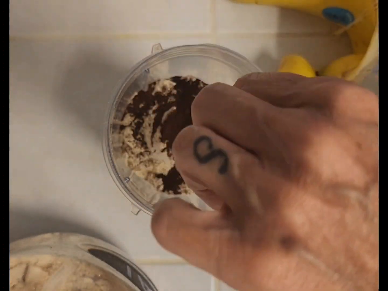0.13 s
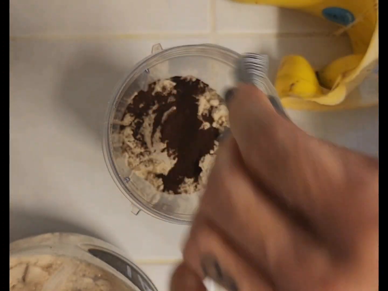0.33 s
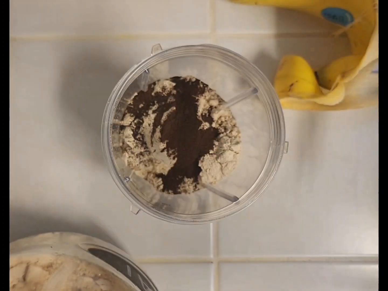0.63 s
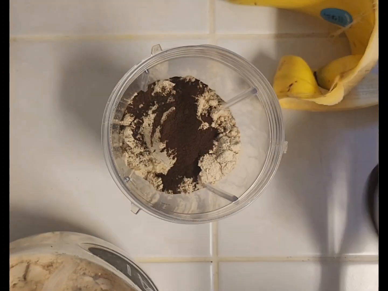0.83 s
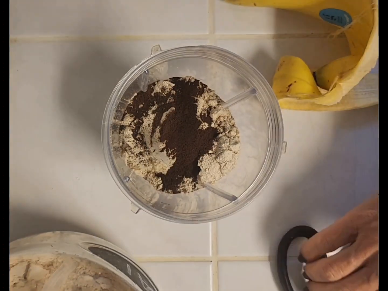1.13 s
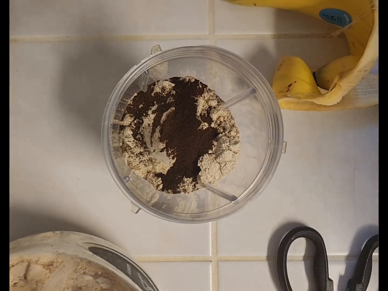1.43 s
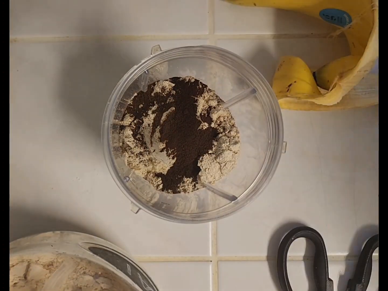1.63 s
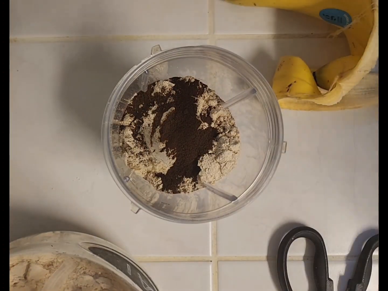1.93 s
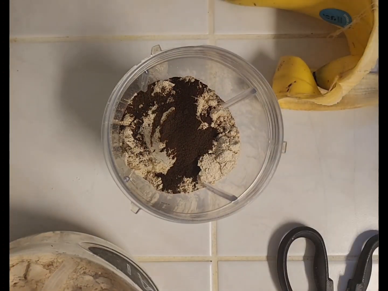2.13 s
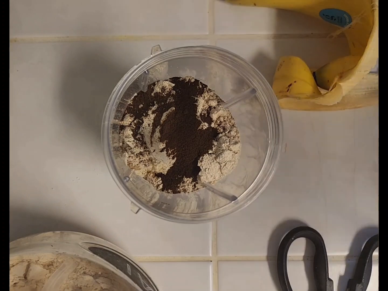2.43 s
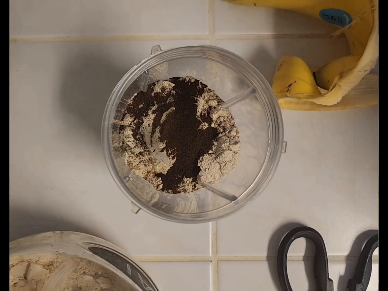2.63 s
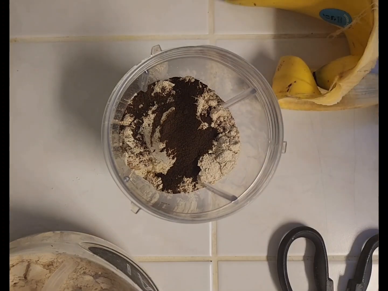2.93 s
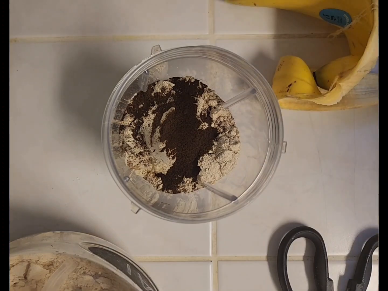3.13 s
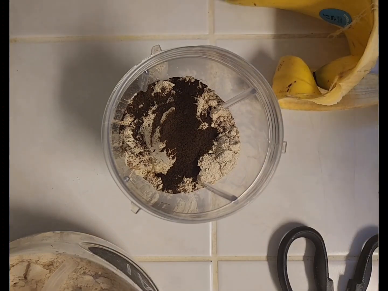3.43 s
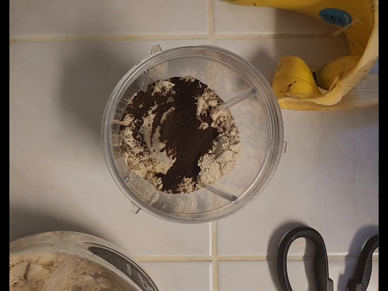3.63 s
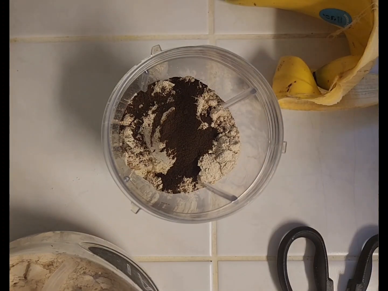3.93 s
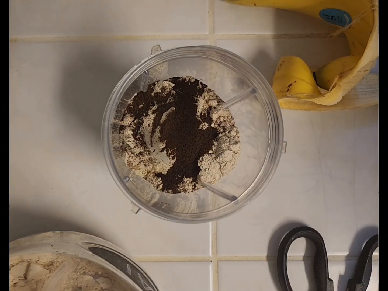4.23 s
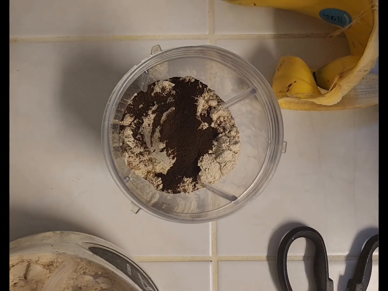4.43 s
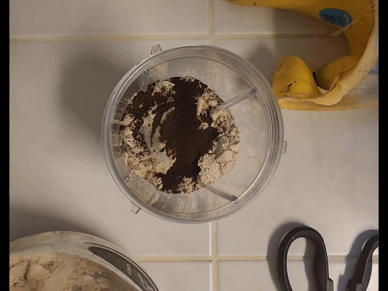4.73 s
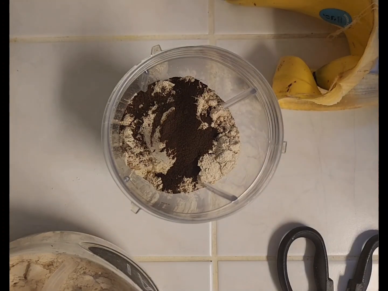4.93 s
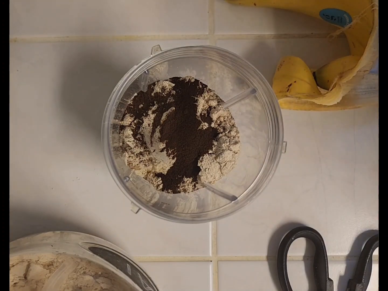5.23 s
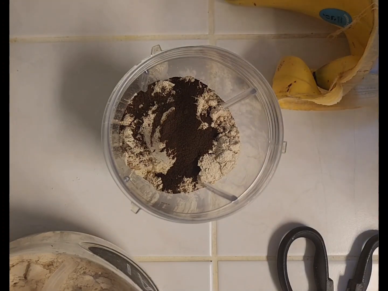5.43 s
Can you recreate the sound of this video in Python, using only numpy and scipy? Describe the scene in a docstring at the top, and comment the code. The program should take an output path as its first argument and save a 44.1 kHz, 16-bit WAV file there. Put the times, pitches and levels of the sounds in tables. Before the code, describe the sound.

Over a low kitchen hum, a foil packet crinkles in short bursts, with a ringing clatter of scissors and a few soft knocks.

```python
"""A foil coffee packet is handled beside a plastic blender cup in a tiled kitchen, over a low appliance hum.
First the foil rustles and its creases snap. At 1.1 s scissors clatter on the tiles, blades ringing.
From 1.7 s the packet is flexed again, among soft bumps on the counter; a hard object clicks at 3.2 s.
The foil is shaken out, loudest near 3.8 s, and a last few faint snaps and bumps come near 5.5 s.
The hard room rings for about half a second after each sound."""
import sys
import numpy as np
from scipy import signal
from scipy.fft import rfft, irfft, next_fast_len
from scipy.io import wavfile

SR = 44100
rng = np.random.default_rng(int(sys.argv[2]) if len(sys.argv) > 2 else 0)


def int16_out(signal):
    """Quantize to a 16-bit WAV file."""
    q = np.round(np.clip(np.atleast_2d(signal).T, -1, 1) * 32767)
    wavfile.write(sys.argv[1], SR, q.astype(np.int16))


N = 245637
T = np.arange(N) / SR


def amp(db):
    """Decibels to gain."""
    return 10 ** (np.asarray(db) / 20)


def unit(x):
    """Scale to rms 1."""
    return x / np.sqrt(np.mean(x ** 2))


def along(hz, points):
    """Interpolate a table over log frequency."""
    points_hz, values = np.transpose(points)
    return np.interp(np.log(hz), np.log(points_hz), values)


def bell(hz, centre_hz, width_oct):
    """Smooth hump, 1 at its centre."""
    return np.exp(-.5 * (np.log2(hz / centre_hz) / width_oct) ** 2)


def treble(hz, corner_hz=6500):
    """High shelf from 0 to 1."""
    return 1 / (1 + (corner_hz / hz) ** 3)


def fade(t, t60_s):
    """Exponential decay."""
    return np.exp(-np.log(1000) * t / t60_s)


def add(out, start_s, x):
    """Mix x into out at start_s."""
    i = max(int(start_s * SR), 0)
    out[:, i:i + x.shape[1]] += x[:, :max(N - i, 0)]


def colour(x, curve_db):
    """Zero-phase filter; curve_db maps Hz to dB."""
    size = next_fast_len(x.shape[-1])
    hz = np.maximum(np.fft.rfftfreq(size, 1 / SR), 1)
    return irfft(rfft(x, size) * amp(curve_db(hz)), size)[..., :x.shape[-1]]


def resonate(x, curve_db):
    """Minimum-phase filter: peaks ring after the push, never before."""
    size = x.shape[-1]
    hz = np.maximum(np.fft.rfftfreq(size, 1 / SR), 1)
    cepstrum = irfft(np.log(amp(curve_db(hz))), size)
    cepstrum[1:size // 2] *= 2
    cepstrum[size // 2 + 1:] = 0
    return irfft(rfft(x) * np.exp(rfft(cepstrum)), size)


def wander(shape, corner_hz):
    """Slow random motion, rms 1."""
    return unit(colour(rng.standard_normal(shape), lambda hz: -20 * np.log10(1 + (hz / corner_hz) ** 2)))


def stereo_noise(size, split_hz):
    """Noise shared by both channels in the bass, unrelated above split_hz."""
    mid, side = rng.standard_normal((2, size))
    side = colour(side, lambda hz: -10 * np.log10(1 + (split_hz / hz) ** 2))
    return np.array([mid + side, mid - side])


def grains(rate_hz, spread_db, t60_s):
    """Random tiny impacts of very unequal size."""
    sizes = amp(spread_db * np.minimum(rng.exponential(size=N), 4)) * rng.standard_normal(N)
    clicks = sizes * (rng.random(N) < rate_hz / SR)
    energy = signal.fftconvolve(clicks ** 2, fade(T[:SR // 50], t60_s) ** 2)[:N]
    return unit(np.sqrt(np.abs(energy)) * stereo_noise(N, 900))


def impact(curve_db, t60_s, split_hz, left_db, crack, rise_s, right_lag_samples=21):
    """A crack and a dying noise burst through a body's resonances; the left channel leads."""
    t = T[:2 ** 13]
    push = (fade(t, t60_s) + crack * fade(t, .004)) * (1 - np.exp(-t / rise_s))
    burst = resonate(stereo_noise(len(t), split_hz) * push, curve_db)
    burst /= np.sqrt(np.sum(burst ** 2, axis=1, keepdims=True) / (.012 * SR))  # energy of 12 ms at rms 1
    right = np.pad(burst[1], (right_lag_samples, 0))[:len(t)]
    return np.array([burst[0] * amp(left_db / 2), right * amp(-left_db / 2)])


def ring(contact, modes, gain_db):
    """Decaying modes of a struck body, driven by the contact sound."""
    t = T[:SR // 2]
    response = 0
    for pitch_hz, level_db, t60_s in modes:
        # short waves reach the two channels out of phase
        phase = rng.uniform(0, 2 * np.pi) + rng.standard_normal((2, 1)) * min(pitch_hz / 1200, 2)
        response = response + amp(level_db) * fade(t, t60_s) * np.sin(2 * np.pi * pitch_hz * t + phase)
    response /= np.sqrt(np.sum(response ** 2) / 2)
    return amp(gain_db) * signal.fftconvolve(contact, response, axes=1)[:, :N]


# rumble and hiss: freq_hz, gain_db
RUMBLE_SPECTRUM = [(20, -21), (32, -11), (48, -9), (95, -7.5), (140, -13.5), (205, -20.5), (260, -43),
                   (400, -36.5), (800, -46.5), (1600, -43.5), (3000, -52.5), (6500, -55.5), (8500, -55.5),
                   (9800, -70.5), (16000, -66)]
# hum tones: pitch_hz, level_db
HUM_TONES = [(49, -58.5), (88.5, -56.5)]


def appliance(rumble_db=-54.5, drift_ratio=.084, swell_db=2.3):
    """A wavering low hum in a rumble, under faint even hiss."""
    out = amp(rumble_db) * unit(colour(stereo_noise(N, 900), lambda hz: along(hz, RUMBLE_SPECTRUM)))
    for pitch_hz, level_db in HUM_TONES:
        drift, swell = wander((2, N), corner_hz=6)
        phase = 2 * np.pi * np.cumsum(pitch_hz * (1 + drift_ratio * drift)) / SR
        out += amp(level_db + swell_db * swell) * np.sqrt(2) * np.sin(phase)
    return out


# room decay: band_hz, t60_s
ROOM_DECAY = [(100, 0.16), (500, 0.43), (2000, 0.47), (5000, 0.44), (9000, 0.34), (15000, 0.24)]


def room(send, early_db=-37, early_t60_s=.14, tail_db=-42):
    """Tiles and cupboards reflect at once; a diffuse tail follows, longest in the midrange."""
    t = T[:int(.8 * SR)]
    noise = unit(stereo_noise(len(t), 450))
    tail = 0
    for band_hz, t60_s in ROOM_DECAY:
        weights = [(hz, float(hz == band_hz)) for hz, _ in ROOM_DECAY]
        band = colour(noise, lambda hz: 20 * np.log10(along(hz, weights) + 1e-9))
        tail = tail + band * fade(t, t60_s)
    early = unit(stereo_noise(len(t), 620)) * fade(t, early_t60_s)
    onset = np.clip(t / .0005 - .5, 0, 1)
    response = (amp(early_db) * early + amp(tail_db) * tail) * onset
    return signal.fftconvolve(send, response, axes=1)[:, :N]


# counter top, also rung by the scissors: pitch_hz, level_db, t60_s
COUNTER_MODES = [(111, 1, .44), (144, -7, .3), (181, 2, .42), (228, -2.5, .2), (365, -9.5, .25),
                 (452, -3, .3), (481, -2.5, .27), (632, 0, .26), (685, -4, .26), (932, -8, .3)]
# knocks of cup, fingers and counter: start_s, level_db, centre_hz, width_oct
BUMPS = [(0.02, -37.5, 2260, 0.27), (0.022, -47, 630, 0.18), (.161, -38.5, 700, .12),
         (0.163, -52, 353, 0.15), (1.275, -27.5, 100, .35), (1.378, -33.5, 173, 0.41),
         (2.046, -44, 150, 0.89), (2.076, -33, 188.5, 0.76), (2.106, -47, 1490, 0.72),
         (2.849, -36, 176.4, 0.35), (2.870, -33.5, 204, .34), (2.876, -42.5, 482, 0.14),
         (2.929, -43.5, 1940, 0.53), (3.309, -32, 470, 0.86), (3.813, -32.5, 104, 0.87),
         (3.851, -37.5, 357, 0.16), (3.942, -30, 155, 0.63), (3.948, -36, 542, 0.12),
         (3.953, -39, 1420, 0.14), (4.975, -58.5, 850, 0.69), (4.991, -47, 104.8, 0.56),
         (5.529, -46.5, 1560, 0.27), (5.555, -44.5, 1620, .25)]


def bumps():
    """Soft, damped knocks, each one broad resonance, carried by the counter."""
    knocks = np.zeros((2, N))
    for start_s, level_db, centre_hz, width_oct in BUMPS:
        def curve_db(hz):
            offset_oct = np.log2(hz / centre_hz)
            peak_db = -24 * np.log10(1 + (offset_oct / width_oct) ** 2 / 2)
            return peak_db - 14 * treble(hz) - 3 * offset_oct
        t60_s = .14 * (200 / centre_hz) ** .5  # higher bumps die sooner
        knock = impact(curve_db, t60_s, split_hz=1500, left_db=.8, crack=.2, rise_s=.3 / centre_hz)
        add(knocks, start_s, amp(level_db) * knock)
    return knocks + ring(knocks, COUNTER_MODES, gain_db=-22.5)


# resonances of the hard object: centre_hz, gain_db, width_oct
CLICK_PEAKS = [(784, 10.5, 0.43), (1800, 10.5, 0.12), (2246, 18.5, 0.046), (3900, 6.5, 0.076),
               (4430, 10, 0.09)]


def click(start_s=3.219, level_db=-36.5):
    """A small hard object clicks: a duller snap with a few briefly ringing resonances."""
    def curve_db(hz):
        peaks_db = sum(db * bell(hz, centre_hz, width_oct) for centre_hz, db, width_oct in CLICK_PEAKS)
        return along(hz, SNAP_SPECTRUM) - 7 * bell(hz, 900, 1) - 11 * treble(hz) + peaks_db
    out = np.zeros((2, N))
    tick = impact(curve_db, t60_s=.035, split_hz=1900, left_db=.5, crack=.71, rise_s=.0016)
    add(out, start_s, amp(level_db) * tick)
    return out


# steel on tile: freq_hz, gain_db
STEEL_SPECTRUM = [(35, -7), (70, 2), (110, 7), (190, 4.5), (280, -7), (380, 0), (500, 7.5), (680, 0),
                  (850, -3), (1600, -1.5), (2200, -4.5), (3000, 0), (4300, -2.5), (6300, -5.5), (8300, -8),
                  (9600, -16), (13000, -12), (15000, -16.5)]
# scissor blades: pitch_hz, level_db, t60_s
BLADE_MODES = [(1670, -4, .2), (2338, -3, .22), (2879, -3, .2), (2930, 0, .22), (3060, -2.5, .17),
               (3213, -3, .2), (3275, -2.5, .17), (3596, -3.5, .18), (4015, 0, .18), (4474, -4, .17),
               (4650, -4, .17), (5360, -4, .18), (5800, -1, .17), (6347, -2, .2)]
# blows on the tiles: start_s, strength_db, handle_thump_db, treble_db
SCISSOR_BLOWS = [(1.087, -29, 16.5, 12.5), (1.121, -28.5, 11.5, 13.5), (1.148, -34.5, 0.5, 10.5),
                 (1.191, -21.5, 3, -6.5), (1.204, -14.5, -4.5, -4.5), (1.223, -23.5, 2.5, -12),
                 (1.273, -14.5, -2.5, 3), (1.284, -21, 0, 1), (1.308, -17, -1.5, -4.5),
                 (1.333, -21.5, -7.5, -12), (1.364, -27, -5.5, -35)]


def scissors(contact_gain_db=-2.5, chatter_gain_db=-17.5, chatter_t60_s=.37):
    """Handles land, loose blades bounce and chatter; every contact rings the blades and the counter."""
    contact, chatter_energy = np.zeros((2, N)), np.zeros((1, N))
    for start_s, strength_db, handle_thump_db, treble_db in SCISSOR_BLOWS:
        def curve_db(hz):
            return along(hz, STEEL_SPECTRUM) + handle_thump_db * bell(hz, 240, 1) + treble_db * treble(hz)
        clack = impact(curve_db, t60_s=.028, split_hz=550, left_db=.5, crack=1.2, rise_s=.0001)
        add(contact, start_s, amp(strength_db + contact_gain_db) * clack)
        shake = amp(strength_db + chatter_gain_db) * fade(T[None, :SR], chatter_t60_s)
        add(chatter_energy, start_s, shake ** 2)
    chatter = colour(grains(rate_hz=1200, spread_db=4, t60_s=.012), lambda hz: along(hz, STEEL_SPECTRUM))
    contact += np.sqrt(chatter_energy) * unit(chatter)
    return contact + ring(contact, BLADE_MODES, gain_db=-18.5) + ring(contact, COUNTER_MODES, gain_db=-17)


# fine foil crackle: freq_hz, gain_db
CRACKLE_SPECTRUM = [(100, -9), (300, -17), (560, 5), (950, -16.5), (1500, 0), (2000, -6), (2700, -9.5),
                    (3900, -3), (5200, -6.5), (8200, -5), (9800, -12), (14500, -10)]
# the hand flexing the foil: start_s, length_s, strength_db, treble_db
SQUEEZES = [ (0, 0.035, -44, -7.5), (.03, 0.19, -65, -9), (0.418, 0.11, -53.5, 3), (.60, 0.064, -72, 8.5),
            (1.768, .09, -43, -17), (1.87, 0.19, -56, -42), (2.612, 0.27, -59.5, 9), (2.901, 0.15, -64, 2),
            (3.059, 0.24, -72, 11), (3.649, 0.26, -49.5, -33), (3.728, 0.083, -42, 1),
            (3.784, 0.11, -35.5, -14), (4.91, 0.12, -70.5, -7)]


def rustle(squeeze_gain_db=-2.54, hold_db=-80.5, hold_start_s=1.4, hold_end_s=4.1):
    """Each squeeze swells and relaxes a bed of fine crackle; held foil keeps stirring faintly."""
    fits_db = -1.36 * wander(N, corner_hz=43.6)  # foil gives way in fits
    ticks = grains(rate_hz=3500, spread_db=2, t60_s=.0074)
    crackle = unit(colour(ticks, lambda hz: along(hz, CRACKLE_SPECTRUM))) * amp(fits_db)
    highs = colour(crackle, lambda hz: 20 * np.log10(treble(hz)))
    lows = crackle - highs
    out = amp(hold_db) * crackle * (T > hold_start_s) * (T < hold_end_s)
    for start_s, length_s, strength_db, treble_db in SQUEEZES:
        effort = np.sin(np.pi * np.clip((T - start_s) / length_s, 0, 1))
        out += amp(strength_db + squeeze_gain_db) * effort * (lows + highs * amp(treble_db))
    return out


# foil snap, also the base of the click: freq_hz, gain_db
SNAP_SPECTRUM = [(100, -20.5), (350, -12.5), (620, -2), (1100, -4.5), (2000, 3), (3000, -2), (4300, -1.5),
                 (6500, -2), (8300, -2), (9800, -11), (12500, -3.5), (15000, -9.5)]
# snapping creases: start_s, level_db, body_db, treble_db, facet_hz
CREASES = [(0.149, -45.5, 13, -4, 1600), (.160, -37.5, -17, -23, 2940), (0.166, -36.5, -9, 2.5, 4300),
           (.449, -31, 10.5, 9.5, 2020), (0.754, -50, 9, -7.5, 3900), (1.682, -63, -2, -14, 4340),
           (1.728, -47, -5, -16, 5620), (1.739, -41, 15, -9, 1840), (1.781, -42.5, 9, -24, 3140),
           (1.900, -55.5, 11, -10, 2294), (2.850, -48, 19.5, 8.5, 2080), (2.873, -49, 14, -5, 2260),
           (2.928, -50, 4, -10.5, 2060), (3.564, -60, 23, 6.5, 2720), (3.736, -51, 7, 4, 3700),
           (3.806, -37.5, -33, -10, 1806), (3.823, -37, 1, -13, 3870), (3.875, -41.5, -21, -8.5, 3700),
           (3.943, -35, 1, -7.5, 1500), (5.475, -62.5, 0, -13, 5160), (5.554, -55.5, 9.5, 0, 1660)]


def creases(aside_s=.6, near_send_db=7, aside_send_db=11.5):
    """Creases snap through, each flipped facet ringing at its own pitch; returns direct and room send."""
    direct, send = np.zeros((2, 2, N))
    for start_s, level_db, body_db, treble_db, facet_hz in CREASES:
        def curve_db(hz):
            foil_db = along(hz, SNAP_SPECTRUM) + body_db * bell(hz, 590, 1) + treble_db * treble(hz)
            return foil_db + 6 * bell(hz, facet_hz, .17)
        snap = impact(curve_db, t60_s=.025, split_hz=4550, left_db=2.5, crack=1, rise_s=.00013)
        send_db = near_send_db if start_s < aside_s else aside_send_db  # more room once taken aside
        add(direct, start_s, amp(level_db) * snap)
        add(send, start_s, amp(level_db + send_db) * snap)
    return direct, send


def scene():
    """Packet, bumps, scissors and click, each with its own room send, over the hum."""
    snaps, snap_send = creases()
    foil, knocks, steel, tick = rustle(), bumps(), scissors(), click()
    send = snap_send + amp(5) * foil + amp(6) * knocks + amp(9.5) * steel + amp(13) * tick
    return snaps + foil + knocks + steel + tick + room(send) + appliance()


def record(dry):
    """The microphone rounds the highest peaks; a low-pass cuts the top."""
    cutoff_hz = 15600
    lowpass = signal.ellip(8, .2, 70, cutoff_hz, fs=SR, output="sos")
    return signal.sosfilt(lowpass, np.tanh(dry))


dry = scene()
out = record(dry)
int16_out(out)
```